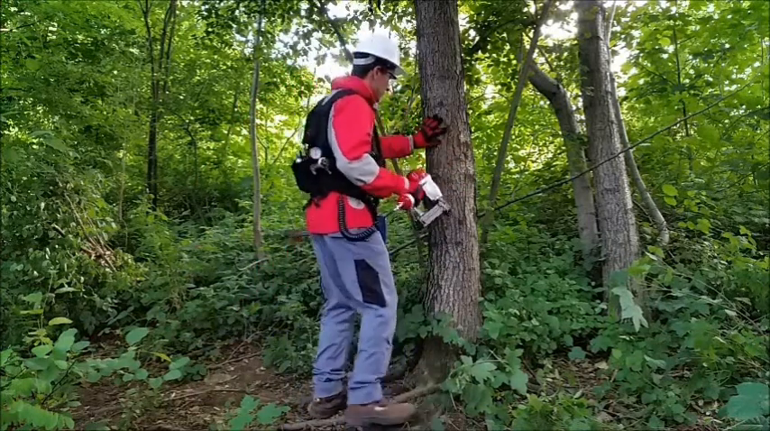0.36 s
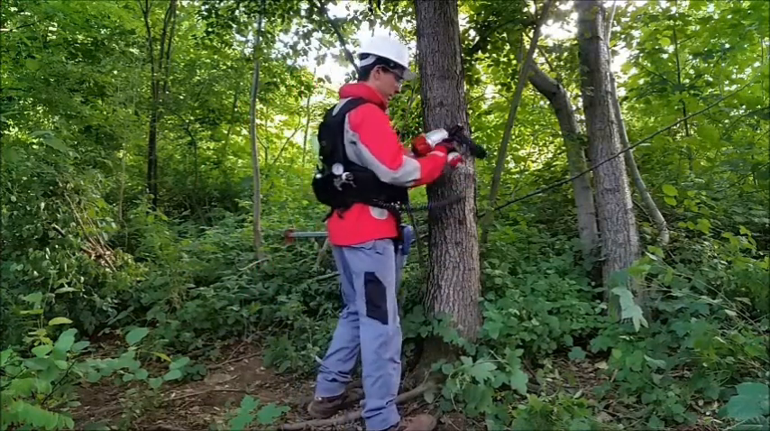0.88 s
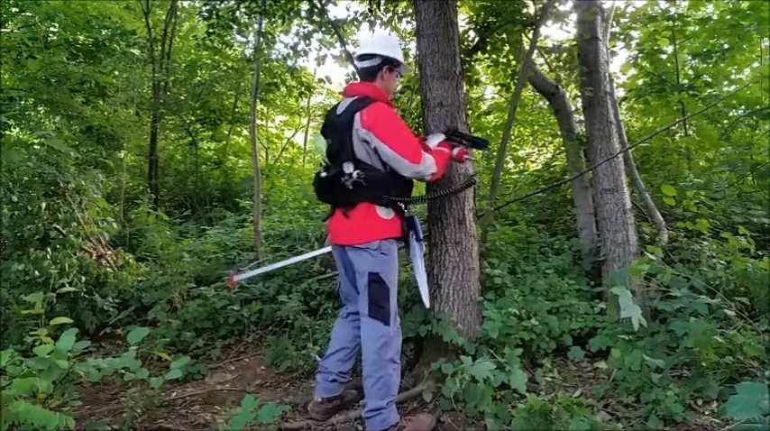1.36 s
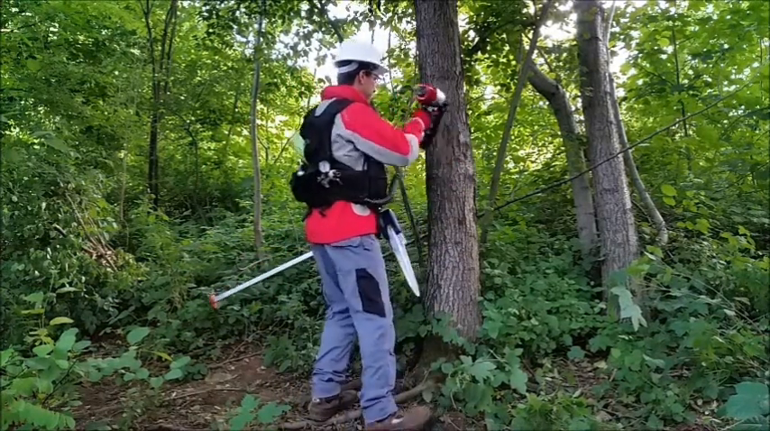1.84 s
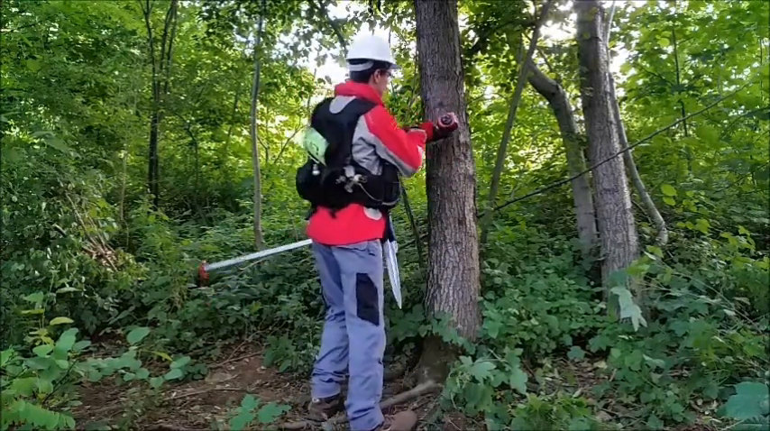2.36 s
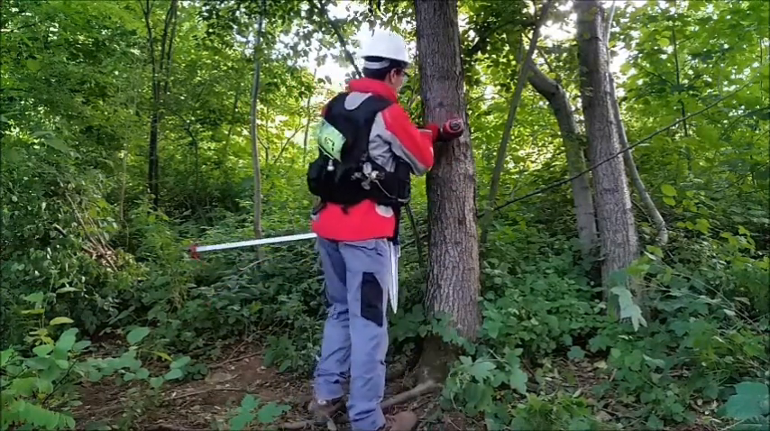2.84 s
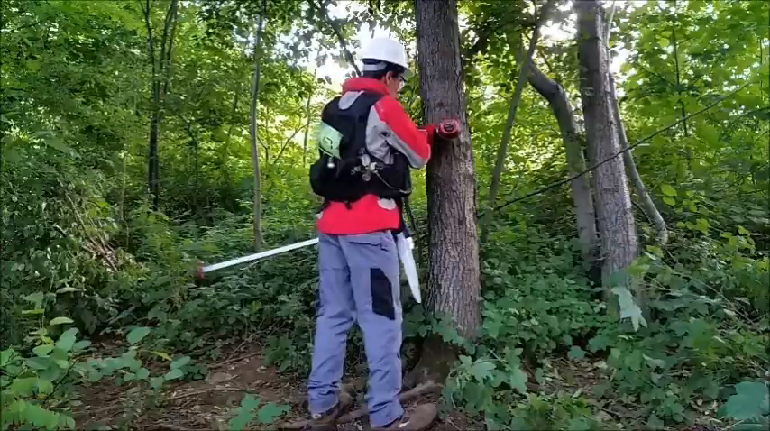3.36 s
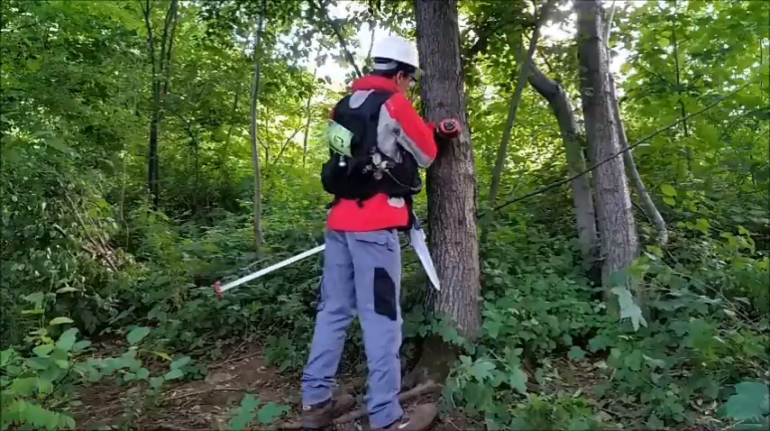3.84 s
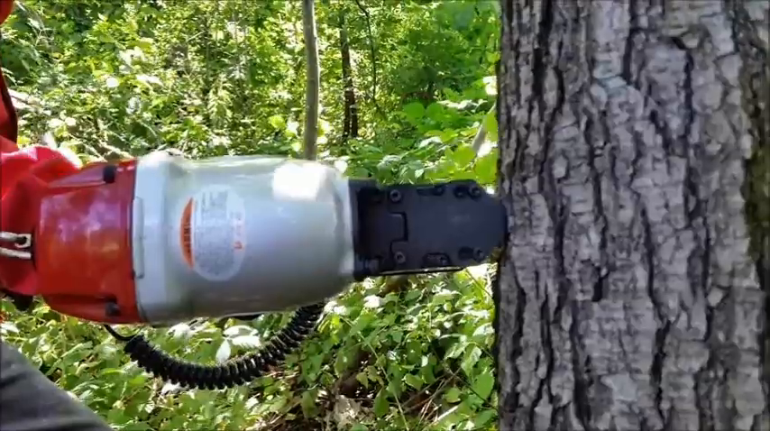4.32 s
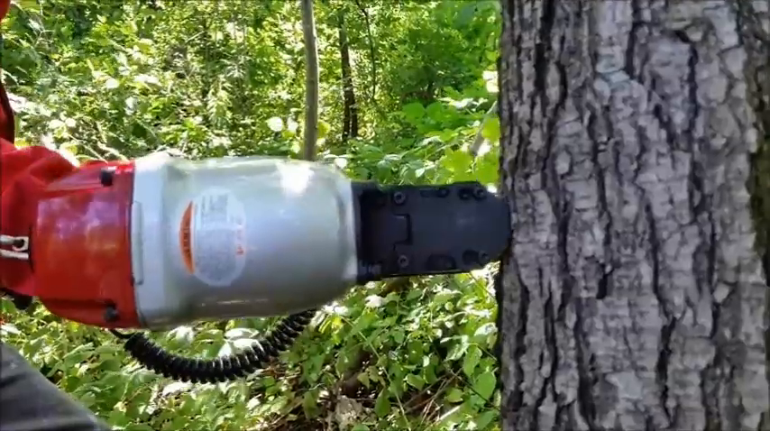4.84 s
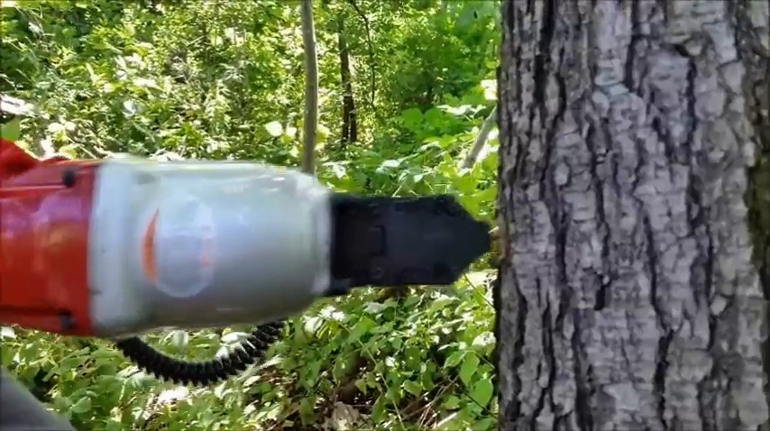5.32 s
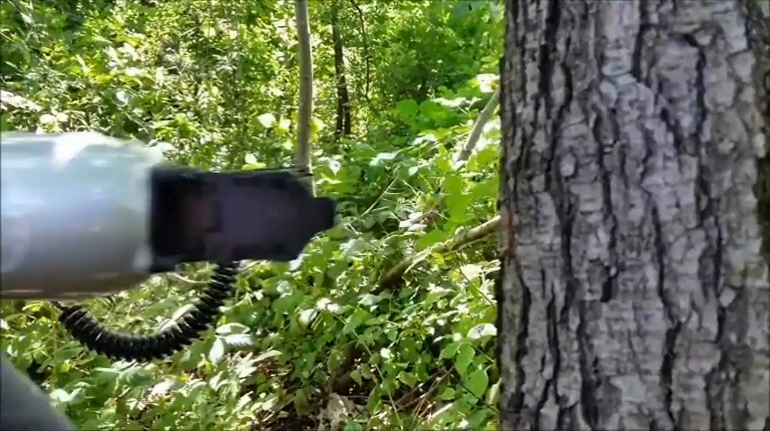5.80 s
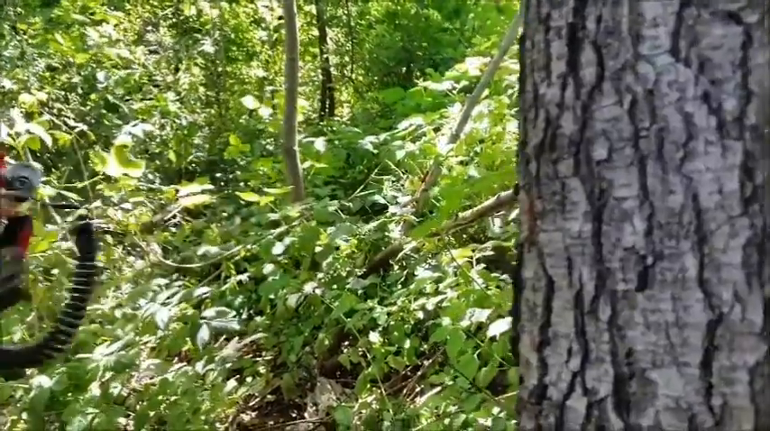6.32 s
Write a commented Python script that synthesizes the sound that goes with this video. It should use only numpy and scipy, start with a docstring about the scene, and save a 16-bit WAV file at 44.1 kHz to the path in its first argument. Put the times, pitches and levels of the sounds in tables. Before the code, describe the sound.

A distant, muffled microphone catches small birds whistling short downward notes in a reverberant wood, with one faint twig snap. A close stereo pair opens with airy hiss; a valve tick leads into a loud, dry nail gun shot against a tree, its compressed air bursting out twice. Near quiet with high chirps follows, before low wind thumps and rising rushing air finish it.

```python
"""Air nailer in a wood of songbirds

Glides of whistled pitch are smeared by echoes off the trunks, over still air and a drone, in one distant microphone.
A close stereo pair then opens on an air nailer held to bark: clicks ring the body modes for valve ticks and piston
blows, and shaped noise makes the exhaust blast. The piston returns with a second blast.
At the end hiss and rumble rise, and wind gusts thump on the two microphones as short low-frequency pulses."""
import sys
import numpy as np
from scipy import signal
from scipy.fft import rfft, irfft, next_fast_len
from scipy.io import wavfile

SR = 44100
rng = np.random.default_rng(int(sys.argv[2]) if len(sys.argv) > 2 else 0)


def volts_from_decibels(level):
    """Turn decibel levels (scalar or array-like) into linear amplitude factors."""
    exponent = np.asarray(level, float) / 20
    return 10 ** exponent


def wav_record(signal):
    """Record a signal, one row per channel, as 16-bit PCM in the file named by sys.argv[1]."""
    frames = np.transpose(np.atleast_2d(signal))
    bounded = np.clip(frames, -1, 1)
    # unit amplitude maps onto the largest positive 16-bit level
    quanta = np.round(bounded * 32767).astype(np.int16)
    wavfile.write(sys.argv[1], SR, quanta)


N = 295029

# Coherence of the air noise at the two close microphones: pitch_hz, likeness (0 to 1)
STEREO_LIKENESS = [(60, 0.43), (200, 1), (550, 0.54), (1600, .05), (15000, .01)]
# Piston blows, three touches each: start_s, level_db, touch_gap_s
PISTON_BLOWS = [(4.8686, -7.5, 0.0028), (4.966, -22, 0.0063), (4.9948, -23.5, .004)]


def at_hz(points, hz):
    """Spectral interpolation: levels are read on a log-frequency axis."""
    point_hz, values = np.array(points).T
    return np.interp(np.log(hz), np.log(point_hz), values)


def in_time(rows):
    """Linear interpolation: each column of a curve becomes one value a sample."""
    s, *columns = np.transpose(rows)
    return [np.interp(np.arange(N) / SR, s, column) for column in columns]


def coloured(spectrum, alike=None, balance=((10, 0), (20000, 0))):
    """Spectral shaping of noise to rms 1; mixing two sources sets the coherence of a stereo pair."""
    size = next_fast_len(N)
    hz = np.maximum(np.arange(size // 2 + 1) * SR / size, 1)
    bins, other = rfft(rng.standard_normal((2, size))) * volts_from_decibels(at_hz(spectrum, hz))
    if alike is not None:
        likeness = np.clip(at_hz(alike, hz), 0, 1)
        sign = np.array([[1], [-1]])   # left, right
        bins = np.sqrt(1 + likeness) * bins + np.sqrt(1 - likeness) * other * sign
        bins = bins * volts_from_decibels(sign * at_hz(balance, hz) / 2)
    out = irfft(bins, size)[..., :N]
    return out / out.std()


def ring(clicks, hz, t60):
    """Damped resonance: a unit click sets a sine of initial height 1 ringing."""
    radius = volts_from_decibels(-60 / (t60 * SR))
    angle = 2 * np.pi * hz / SR
    feedback = [1, -2 * radius * np.cos(angle), radius * radius]
    return signal.lfilter([0, np.sin(angle)], feedback, clicks + 1e-18)


def still_air():
    """Stationary broadband noise of the wood under a far traffic-like drone that sinks in level."""
    # Still air in the wood: pitch_hz, relative_level_db
    wood_spectrum = [(18, -44), (30, -10), (154, -5.5), (318, -13.5), (417, -11.5), (1160, -20.5),
                     (1360, -18.5), (2140, -15), (3600, -15), (6800, -17), (8840, -49.5), (15000, -120)]
    # Far drone: pitch_hz, relative_level_db
    drone_spectrum = [(24, -46.5), (40, -27.5), (86, 4), (166, -28.5), (256, -5.5), (457, -13.5),
                      (549, -12), (1100, -2.5), (2100, -12), (2730, -40.5), (4620, -120)]
    # Drone level ahead of the treble cut: time_s, rms_db
    drone_level = [(0, -70), (2.01, -72.5), (2.03, -82), (6.69, -96)]
    wood = volts_from_decibels(-74) * coloured(wood_spectrum)
    drone = volts_from_decibels(in_time(drone_level)[0]) * coloured(drone_spectrum)
    top_hz = 7160   # the distant microphone hears next to no hiss above this
    return signal.sosfilt(signal.cheby2(8, 40, top_hz, fs=SR, output="sos"), wood + drone)


def close_air():
    """Partly coherent noise: hiss and rumble share one level over a steady hum, silent until the pair opens."""
    # Hiss and rumble at the pair, which opens at the first point;
    # the level drops after the shot, then rises: time_s, hiss_rms_db
    air_level = [(4.65, -53), (4.85, -52.5), (5.0, -69), (5.4, -72.5), (5.8, -77), (6.5, -52),
                 (6.69, -50.5)]
    # Hiss of the air: pitch_hz, relative_level_db
    hiss_spectrum = [(150, -12.5), (300, 1), (550, -7), (1800, -8.5), (3500, -14), (4700, -10),
                     (9500, -18.5), (15000, -28), (16500, -51.5)]
    # Low rumble of the air: pitch_hz, relative_level_db
    rumble_spectrum = [(25, -29), (45, -11.5), (68, 2), (110, -11.5), (200, -14), (350, -32), (600, -58)]
    hum_hz, hum_rms_db, rumble_over_hiss_db = 66, -72, 2
    level = volts_from_decibels(in_time(air_level)[0])
    is_open = np.arange(N) > air_level[0][0] * SR
    hum = np.sqrt(2) * volts_from_decibels(hum_rms_db) * np.sin(2 * np.pi * hum_hz * np.arange(N) / SR)
    hiss = coloured(hiss_spectrum, STEREO_LIKENESS)
    rumble = volts_from_decibels(rumble_over_hiss_db) * coloured(rumble_spectrum, STEREO_LIKENESS)
    return is_open * (hum + level * (hiss + rumble))


def wind_thumps():
    """Eddy pressure on a port: a brief low oscillation in a Gaussian envelope, leaking to the other port."""
    # Gust thumps: envelope_centre_s, envelope_peak_db, port (0 left, 1 right)
    thumps = [(6.176, -38, 1), (6.254, -31.5, 1), (6.270, -33, 0), (6.301, -29, 1), (6.321, -32.5, 1),
              (6.446, -32, 0), (6.514, -25.5, 1), (6.533, -28, 1), (6.554, -24, 0), (6.613, -27, 0),
              (6.641, -24, 0), (6.662, -25, 0), (6.681, -22.5, 0)]
    port_hz, pitch_spread, other_port_db = (124, 112), 0.11, -17.5   # spread in natural-log units
    out = np.zeros((2, N + SR))
    half = SR // 25
    t = np.arange(-half, half) / SR
    for s, db, port in thumps:
        port = round(port)
        hz = port_hz[port] * np.exp(pitch_spread * rng.standard_normal())
        push = np.cos(2 * np.pi * hz * t + 1.4) * np.exp(-(t * hz / 0.45) ** 2)
        gain = volts_from_decibels(db + other_port_db * (np.arange(2) != port))
        at = int(s * SR) - half
        out[:, at:at + len(t)] += gain[:, None] * push
    return out[:, :N]


def twig():
    """Impulsive excitation: a far snap is a band-passed click."""
    # Far twig: start_s, click_db ahead of the band-pass
    snaps = [(3.707, -37)]
    clicks = np.zeros(N)
    for s, db in snaps:
        clicks[int(s * SR)] = volts_from_decibels(db)
    return signal.sosfilt(signal.butter(2, [900, 6500], "band", fs=SR, output="sos"), clicks)


def songs():
    """Piecewise-linear frequency modulation: each call is a start and corners of time, pitch and level."""
    # Plain whistles, and two faint low ghost tones (at 5.559 and 5.93 s) of higher whistles, all fading
    # as they go: start_s, length_s, first_hz, last_hz, first_level_db
    whistles = [(.146, 0.15, 3207, 3357, -52), (0.283, 0.065, 2630, 2730, -60),
                (0.689, .13, 3199, 3405, -50.5), (0.819, 0.026, 2786, 2770, -53),
                (1.15, 0.047, 3924, 3683, -48), (1.417, 0.019, 2437, 2580, -56),
                (1.945, 0.034, 2896, 2844, -64.5), (2.013, 0.019, 2940, 2040, -58),
                (2.114, 0.026, 2950, 2030, -58.5), (2.045, 0.069, 3650, 3620, -67.5),
                (2.09, 0.059, 4794, 2970, -54.5), (2.12, 0.041, 3180, 2820, -56.5),
                (2.303, .04, 5880, 5160, -56.5), (2.326, 0.049, 2070, 1964, -72.5),
                (2.436, 0.049, 2590, 2220, -73), (2.483, 0.064, 4390, 3770, -58.5),
                (2.522, 0.05, 3135, 3405, -59.5), (2.562, 0.033, 3370, 3537, -53.5),
                (2.6, 0.086, 4910, 4980, -50.5), (2.636, 0.032, 2340, 2350, -70),
                (2.667, 0.049, 3436, 2860, -61.5), (2.832, 0.031, 2635, 2862, -51.5),
                (2.837, 0.02, 2090, 2100, -67), (2.889, 0.047, 2900, 3230, -57.5),
                (3.04, 0.091, 3687, 3744, -59.5), (3.049, 0.036, 3020, 3400, -58.5),
                (3.216, 0.0584, 2860, 2949, -51.5), (3.552, 0.018, 1780, 1890, -71),
                (3.671, 0.027, 2100, 2130, -62.5), (3.769, 0.038, 2500, 2493, -60),
                (3.856, 0.038, 4200, 3070, -69.5), (4.05, 0.098, 3690, 3330, -74.5),
                (4.173, 0.13, 3510, 3760, -77), (4.383, .067, 1330, 1363, -76),
                (4.562, 0.058, 3922, 3760, -52.5), (4.572, .018, 4200, 3850, -56.5),
                (4.657, 0.013, 3684, 3550, -46.5), (4.675, 0.061, 3786, 4090, -51.5),
                (5.263, 0.064, 5850, 6860, -58), (5.288, 0.025, 6250, 5840, -51),
                (5.292, 0.068, 5660, 5150, -50), (5.398, 0.047, 5896, 5735, -52),
                (5.453, 0.097, 6230, 5230, -57.5), (5.559, .22, 1946, 1852, -71.5),
                (5.633, 0.13, 5824, 5800, -61.5), (5.828, 0.056, 4500, 5765, -49),
                (5.901, 0.19, 6290, 6470, -57.5), (5.93, 0.17, 2446, 2590, -78.5)]
    # Held notes that slide slowly down: start_s, hold_s, high_hz, low_hz, hold_level_db
    slides = [(1.194, 0.0059, 3706, 2720, -47), (1.346, 0.0088, 3120, 2443, -52.5),
              (1.583, 0.039, 3703, 2720, -46.5), (3.105, 0.0084, 3590, 3130, -49),
              (3.46, 0.045, 3646, 2800, -50)]
    # Held notes that drop fast onto a short low note: start_s, hold_s, high_hz, low_hz, first_level_db
    tumbles = [(-.08, 0.043, 3042, 2388, -48.5), (0.436, 0.036, 3062, 2310, -48.5),
               (0.932, .036, 3040, 2350, -48), (1.725, 0.053, 2888, 2297, -51),
               (3.715, 0.03, 3020, 2454, -55)]
    whistle_fade_db = 1.5
    slide_s, slide_fade_db = 0.048, 7.5
    drop_s, landing_s = 0.0204, 0.03
    hold_fade_db, landing_db, landing_fade_db = 7.5, -10, 6.5
    calls = []
    for s, length, first, last, db in whistles:
        calls.append((s, [0, length], [first, last], [db, db - whistle_fade_db]))
    for s, hold, high, low, db in slides:
        calls.append((s, [0, hold, hold + slide_s], [high, high, low], [db, db, db - slide_fade_db]))
    for s, hold, high, low, db in tumbles:
        corners = np.cumsum([0, hold, drop_s, landing_s])
        levels = db + np.array([0, -hold_fade_db, landing_db, landing_db - landing_fade_db])
        calls.append((s, corners, [high, high, low, low], levels))
    return calls


def trunk_echo_shape(t):
    """Multiple scattering: echo density builds up, dies exponentially and steps down for farther trunks."""
    rise_s, t60_s = 0.0026, 0.7
    near_trunks_s, far_db = 0.099, -4   # nearer trunks answer within this time
    shape = (1 - np.exp(-t / rise_s)) * volts_from_decibels(-60 * t / t60_s)
    shape *= volts_from_decibels(far_db / (1 + np.exp((near_trunks_s - t) / 0.012)))
    return shape / np.sqrt(np.sum(shape ** 2))


def birds():
    """Convolution with random echoes: each gliding sine meets its own set of trunks."""
    direct_db = -18   # direct sound against the whole swarm of echoes
    warble_spread_hz, warble_rate_hz = 35, 60.8   # unsteady pitch: rms and corner of its spectrum
    out, lead = np.zeros(N + 2 * SR), SR // 10   # the lead holds a call already begun
    t = np.arange(SR * 3 // 4) / SR
    shape = trunk_echo_shape(t)
    keep = np.exp(-2 * np.pi * warble_rate_hz / SR)
    warble = signal.lfilter([1], [1, -2 * keep, keep ** 2], rng.standard_normal(N + SR))
    warble *= warble_spread_hz / warble.std()
    for s, corners, hz, db in songs():
        age = np.arange(int(corners[-1] * SR)) / SR
        u = age / corners[-1]
        at = int(s * SR) + lead
        pitch = np.interp(age, corners, hz) + warble[at:at + len(u)]
        phase = 2 * np.pi * np.cumsum(pitch) / SR
        edges = np.minimum(1, 25.0 * u * (1 - u))   # soft onset and end
        note = np.sqrt(2) * volts_from_decibels(np.interp(age, corners, db)) * edges * np.sin(phase)
        echoes = shape * rng.standard_normal(len(t))
        echoes[0] = volts_from_decibels(direct_db)
        heard = signal.fftconvolve(note, echoes)
        heard *= np.sqrt(np.sum(note ** 2) / np.sum(heard ** 2))   # scattering keeps the energy
        out[at:at + len(heard)] += heard
    return out[lead:lead + N]


def distant_microphone():
    """Amplitude modulation: a gain fluttering at a fixed rate ghosts every tone above and below."""
    # Ghost tones: multiple of the flutter rate, sideband_db
    flutter_sidebands = [(1, -21.5), (2, -28.5), (3, -31), (4, -31.5)]
    flutter_hz = 3900
    turn = 2 * np.pi * flutter_hz * np.arange(N) / SR
    flutter = 1 + sum(2 * volts_from_decibels(db) * np.cos(round(k) * turn) for k, db in flutter_sidebands)
    return (birds() + twig() + still_air()) * flutter


def knocks():
    """Modal excitation: clicks ring every body mode, harder contacts poorer in bass, each side from its own spots."""
    # Hard ticks of valve and latch: start_s, level_db, contact_hardness_hz
    ticks = [(4.8505, -33.5, 2500), (4.8533, -12, 2940), (4.9556, -19.5, 3540), (6.305, -46, 9060)]
    # Modes of tool body and trunk: pitch_hz, relative_level_db, t60_s
    body_modes = [(97, -4.5, 0.014), (296, 0.5, 0.027), (442, -12, 0.035), (757, -3, 0.017),
                  (1168, -12, 0.044), (1330, -8, 0.02), (1755, -1.5, 0.011), (2060, -2, 0.015),
                  (4200, -2, 0.0053)]
    blow_hard_hz, touch_harder, touch_loss_db = 557, 1.4, 0.34   # each touch is harder and fainter
    right_lag_s, scatter_cycles, pan_db, low_cut_hz = 0.00013, 0.46, 0.5, 58
    out, span = np.zeros((2, N)), SR // 8
    contacts = list(ticks)
    for s, db, gap in PISTON_BLOWS:
        for k in range(3):
            contacts.append((s + k * gap, db - k * touch_loss_db, blow_hard_hz * touch_harder ** k))
    for s, db, hard_hz in contacts:
        band = signal.butter(2, [hard_hz * 0.12, hard_hz], "band", fs=SR, output="sos")
        click = signal.sosfilt(band, signal.unit_impulse(span))
        for side in (0, 1):
            for hz, mode_db, t60 in body_modes:
                delay = side * right_lag_s + scatter_cycles * rng.random() / hz
                at = int((s + delay) * SR)
                gain = volts_from_decibels(db + mode_db + pan_db * (1.5 - side) + rng.normal(0, 1.3))
                out[side, at:at + span] += gain * ring(click, hz, t60)
    return signal.sosfilt(signal.butter(2, low_cut_hz, "high", fs=SR, output="sos"), out)


def trunk_thuds():
    """Damped resonance: each piston blow shakes one low mode of the trunk, equal on both sides."""
    thud_hz, t60_s, thud_over_blow_db = 92, 0.1, -14.5
    blows = np.zeros(N)
    for s, db, _ in PISTON_BLOWS:
        blows[int(s * SR)] = volts_from_decibels(db + thud_over_blow_db)
    return ring(blows, thud_hz, t60_s)


def exhaust():
    """Turbulent jet noise: the power swells, holds and decays, the bass sooner than the treble."""
    # Short puffs of air, three around the strokes and a faint one with the late tick: start_s, rms_db
    puffs = [(4.852, -30), (4.8674, -24.5), (4.961, -30.5), (6.304, -53.5)]
    # Exhaust bursts over slower tails, t60 in the band up to 6 kHz: start_s, rms_db, t60_s, tail_rms_db, tail_t60_s
    vents = [(4.872, -14, 0.044, -20.5, .2), (4.9669, -19, 0.23, -34.5, 0.43)]
    # Jet noise: pitch_hz, relative_level_db
    jet_spectrum = [(100, -3.5), (250, -8.5), (600, -0.5), (1200, -3), (2400, 1.5), (3500, -3.5),
                    (5000, 0.5), (9700, -3), (14900, -6.5), (16000, -34.5)]
    # Stereo balance of the jet: pitch_hz, left_over_right_db
    jet_balance = [(60, 9.5), (150, 3.5), (380, 8), (950, -2.5), (2380, -0.5), (5980, -7.5), (15000, 2.5)]
    puff_rise_s, puff_hold_s, puff_t60_s = 0.0027, 0.0036, 0.053   # t60 as for the vents
    vent_rise_s, vent_hold_s = 0.0011, 0.010
    decay_exponent = 0.16   # t60 grows as this power of the band's top pitch
    blasts = [(s, puff_rise_s, puff_hold_s, db, puff_t60_s) for s, db in puffs]
    for s, db, t60, tail_db, tail_t60 in vents:
        blasts.append((s, vent_rise_s, vent_hold_s, db, t60))
        blasts.append((s, vent_rise_s, vent_hold_s, tail_db, tail_t60))
    out = np.zeros((2, N))
    first = int(puffs[0][0] * SR) - SR // 100
    jet = coloured(jet_spectrum, STEREO_LIKENESS, jet_balance)[:, first:]
    t = np.arange(first, N) / SR
    below = 0
    for top_hz in (700, 1500, 3000, 6000, 10000, 19000):
        upto = signal.sosfiltfilt(signal.butter(2, top_hz, fs=SR, output="sos"), jet)
        band = upto - below   # slices that add up without gaps
        longer = (top_hz / 6000) ** decay_exponent
        power = 0
        for s, rise, hold, db, t60 in blasts:
            dying_s = np.maximum(t - s - rise - hold, 0)
            level = np.clip((t - s) / rise, 0, 1) * volts_from_decibels(db - 60 * dying_s / (t60 * longer))
            power = power + level ** 2
        out[:, first:] += band * np.sqrt(power)
        below = upto
    return out


def scene():
    """Superposition: the distant microphone in the middle, the close pair around it."""
    nailer = knocks() + trunk_thuds() + exhaust()
    return distant_microphone() + close_air() + wind_thumps() + nailer


def band_limit(x):
    """A steep low-pass at the top of the band."""
    return signal.sosfilt(signal.butter(12, 16640, fs=SR, output="sos"), x)


def record(dry):
    """Soft saturation: a hyperbolic tangent rounds the peaks."""
    mix = 0.68 * np.tanh(dry / 0.69)
    return band_limit(mix)


dry = scene()
out = record(dry)
wav_record(out)
```